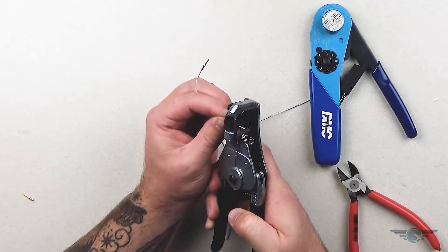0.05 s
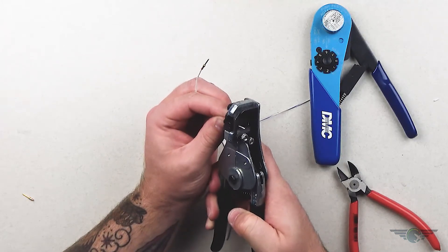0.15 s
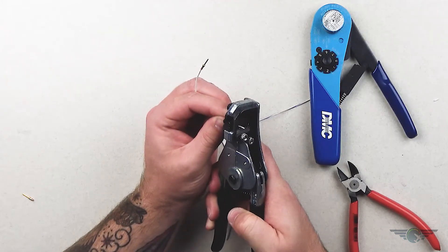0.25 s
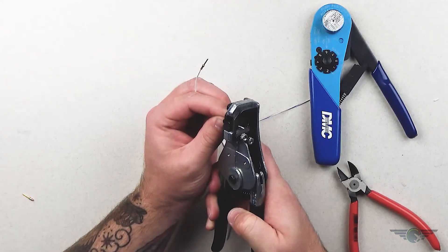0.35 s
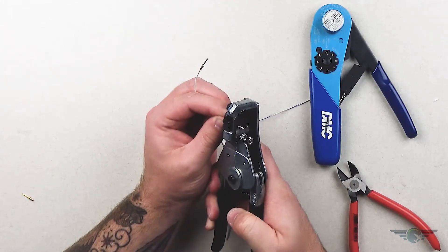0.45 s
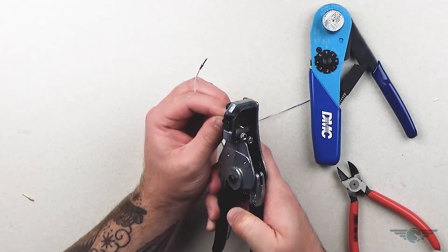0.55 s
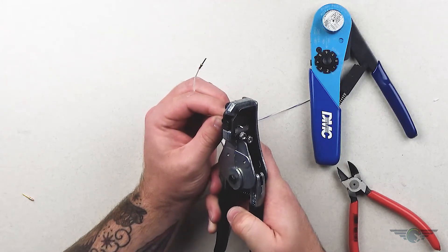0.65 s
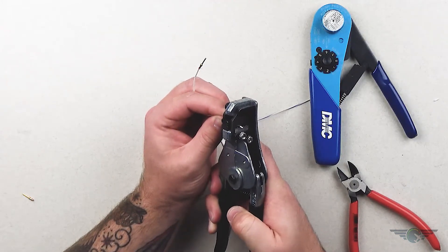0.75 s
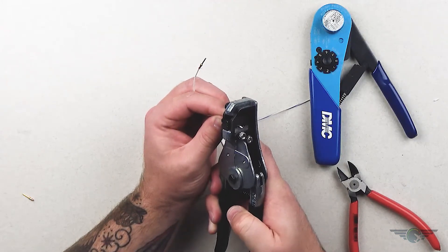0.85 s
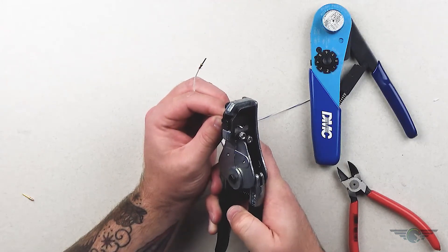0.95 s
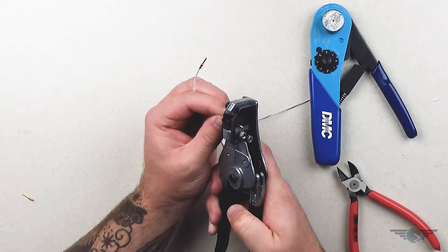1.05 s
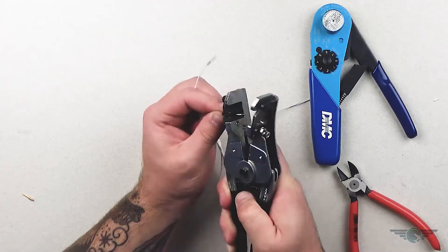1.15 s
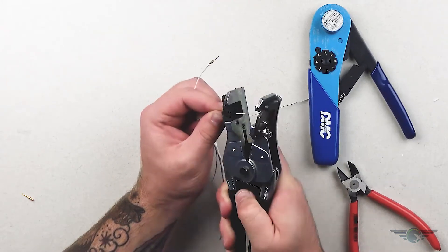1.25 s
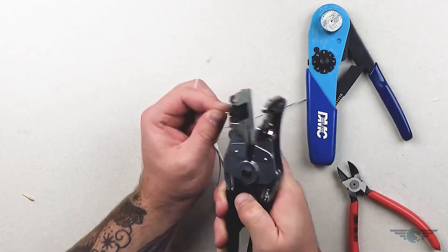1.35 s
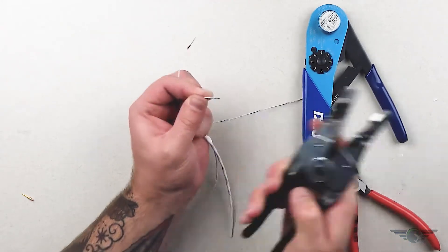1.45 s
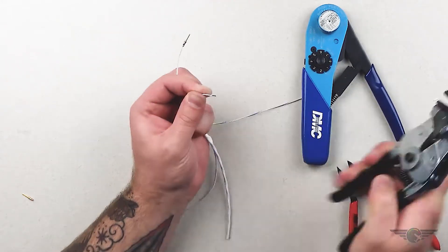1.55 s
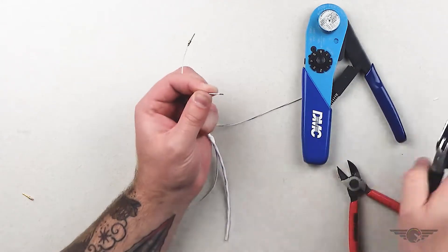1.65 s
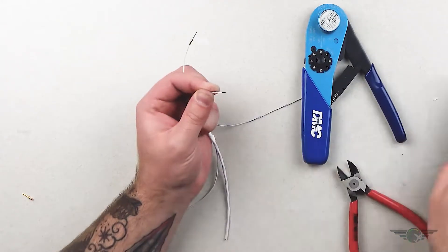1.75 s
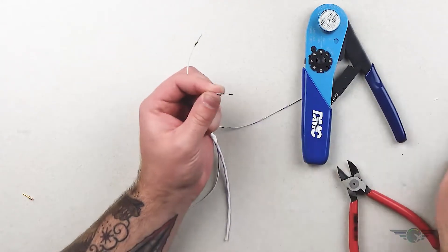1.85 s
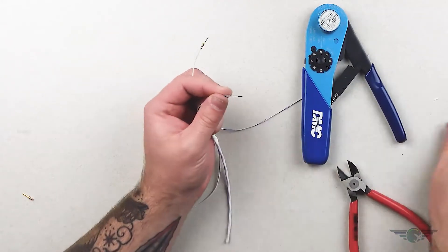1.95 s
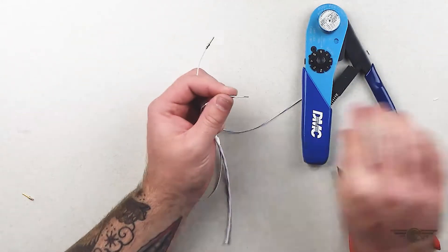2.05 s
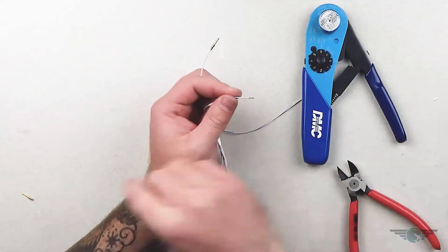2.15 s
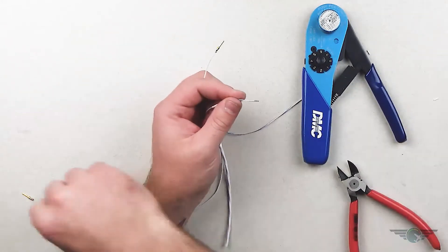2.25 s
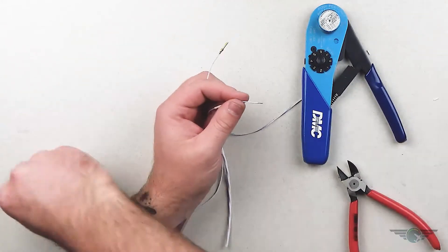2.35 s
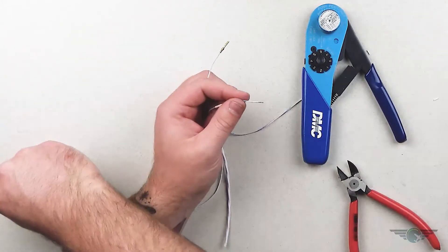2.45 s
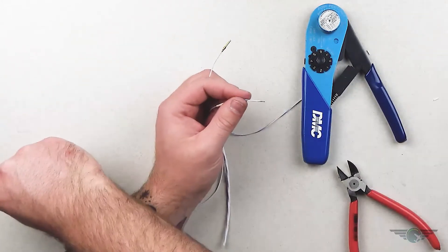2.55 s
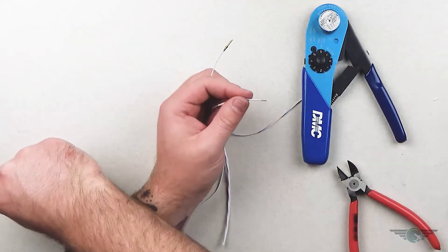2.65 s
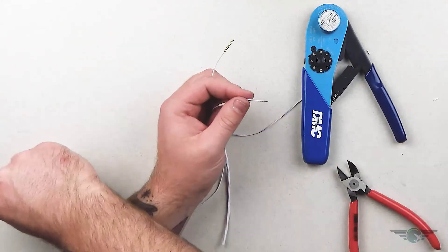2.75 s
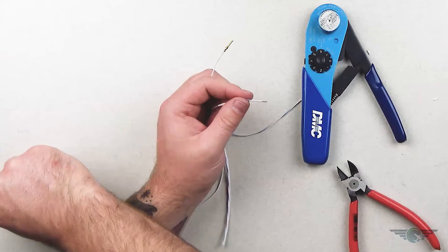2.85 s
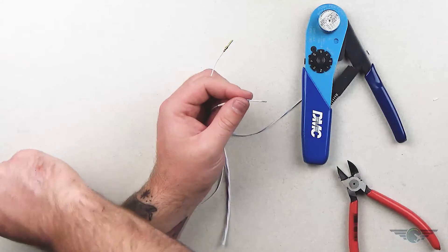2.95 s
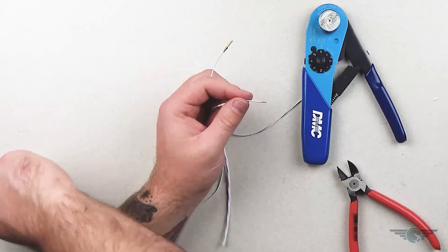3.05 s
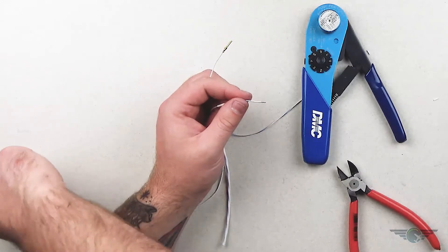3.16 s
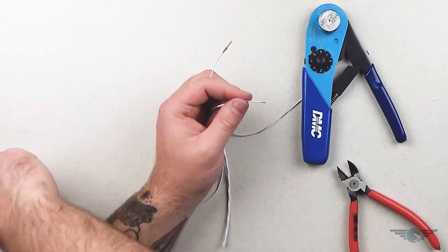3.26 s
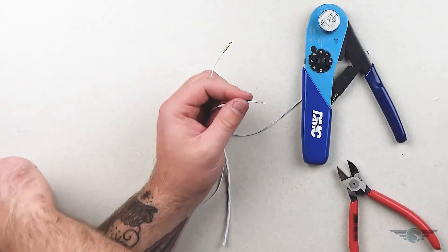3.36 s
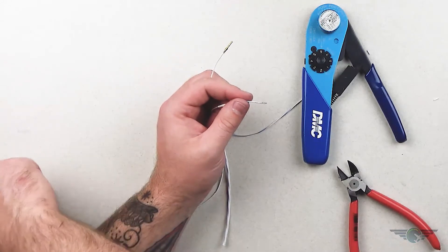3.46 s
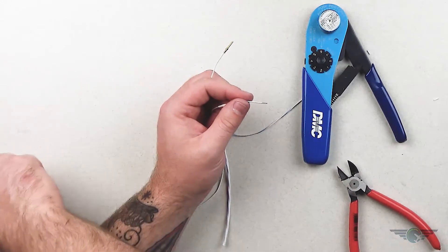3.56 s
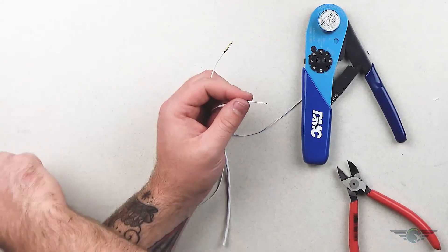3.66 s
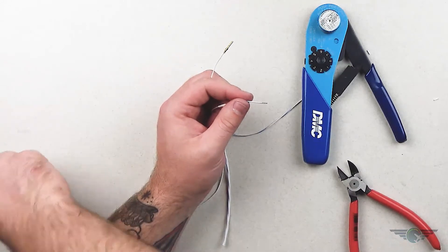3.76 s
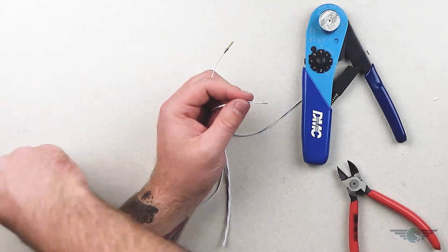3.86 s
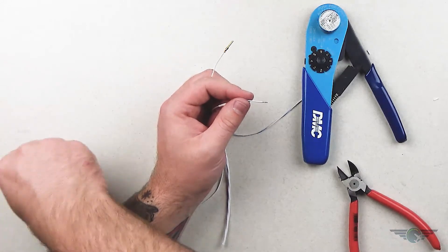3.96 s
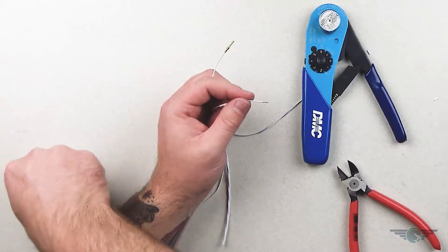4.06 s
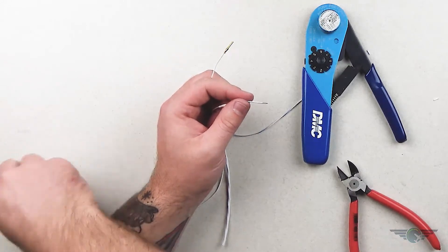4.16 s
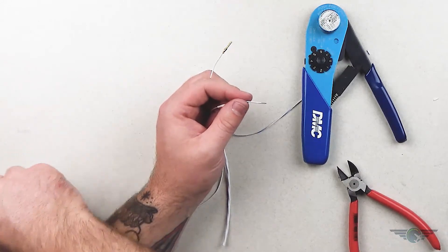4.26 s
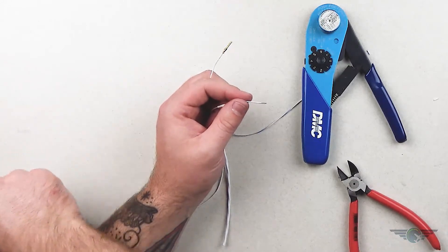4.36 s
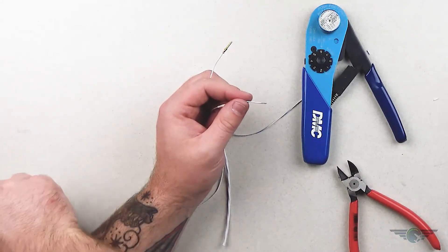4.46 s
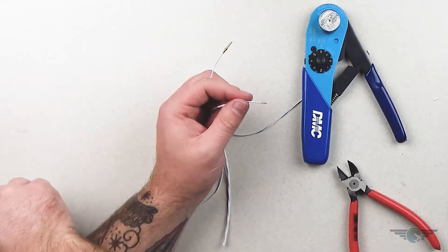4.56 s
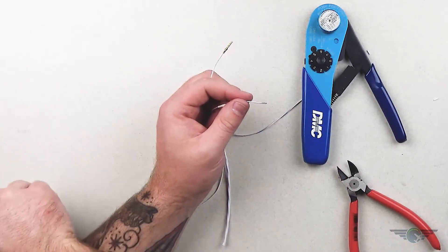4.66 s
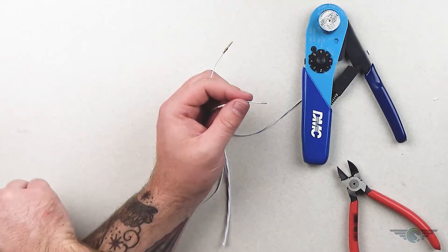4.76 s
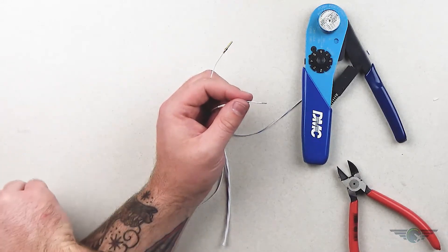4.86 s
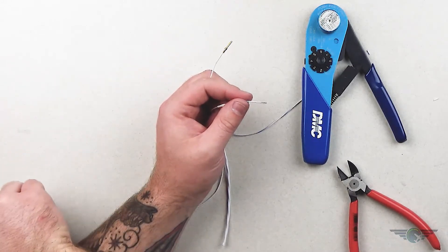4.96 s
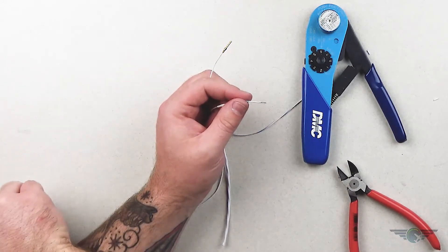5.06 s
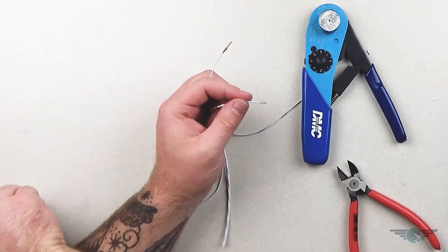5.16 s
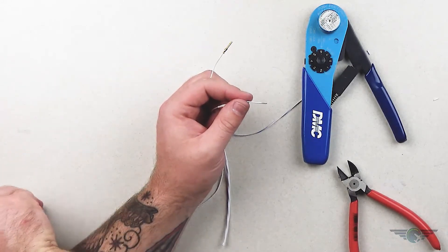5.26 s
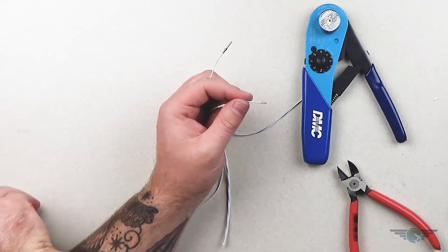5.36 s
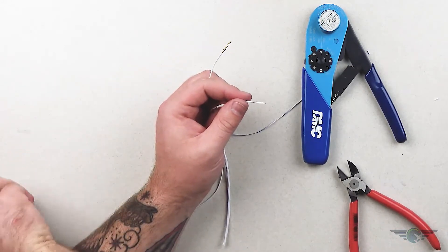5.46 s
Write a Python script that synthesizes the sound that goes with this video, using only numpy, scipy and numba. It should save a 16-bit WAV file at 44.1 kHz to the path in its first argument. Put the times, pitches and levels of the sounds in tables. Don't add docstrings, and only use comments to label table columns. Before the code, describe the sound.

Close microphone at a workbench in a small room. A deep electrical hum and soft fan noise run throughout. After a second of near quiet, a sprung wire stripper ticks and cracks, scrapes wire, snaps shut loudly, then lands on the bench with a heavy knock and quick bounces. Afterwards only hum, with faint finger rustles and tiny ticks.

```python
import sys
import numpy as np
from scipy import signal
from scipy.fft import rfft, irfft
from scipy.io import wavfile
from scipy.ndimage import uniform_filter1d, minimum_filter1d
from numba import njit

SR = 44100
rng = np.random.default_rng(int(sys.argv[2]) if len(sys.argv) > 2 else 0)


def transcribe(signal):
    frames = np.atleast_2d(signal).T
    limited = np.clip(frames, -1, 1)
    pcm = np.round(limited * 32767).astype(np.int16)
    wavfile.write(sys.argv[1], SR, pcm)


def volts_from_decibels(level):
    exponent = np.asarray(level, float) / 20
    return 10 ** exponent


N = 243431
T = np.arange(N) / SR


def level(x, db):
    return x * volts_from_decibels(db) / np.sqrt(np.mean(x ** 2))


def curve(rows):
    s, value = np.transpose(rows)
    return np.interp(T, s, value)


def band(x, lo_hz, hi_hz, order=2):
    edges_hz = [lo_hz, min(hi_hz, 0.45 * SR)]
    return signal.sosfilt(signal.butter(order, edges_hz, "band", fs=SR, output="sos"), x)


def coloured(points):
    hz, db = np.transpose(points)
    f = np.arange(N // 2 + 1) * SR / N
    shape = volts_from_decibels(np.interp(np.log(f + 1), np.log(hz), db))
    return irfft(rfft(rng.standard_normal(N)) * shape, N)


def fade(t, t60):
    return np.exp(-np.log(1000) * t / max(t60, 0.002))


def rise(size, seconds):
    return np.minimum(T[:size] / seconds, 1)


def stroke(s, length, attack, release):
    swell = (T - s) / attack
    let_go = 1 + (s + length - T) / release
    return np.clip(np.minimum(swell, let_go), 0, 1) ** 2


def rings(modes, size, scatter_db=0.0):
    t, out = T[:size], np.zeros(size)
    for hz, db, t60 in modes:
        uneven, detune = rng.standard_normal(2)
        tone = np.sin(2 * np.pi * hz * (1 + 0.003 * detune) * t)
        out += volts_from_decibels(db + scatter_db * uneven) * tone * fade(t, t60)
    return out


def tail(bands, size):
    out = np.zeros(size)
    for hz, db, t60 in bands:
        noise = band(rng.standard_normal(size), hz / 1.286, hz * 1.167)
        out += level(noise, db) * fade(T[:size], t60)
    return out


def add(out, s, sound):
    i = int(s * SR)
    out[i:i + len(sound)] += sound[:len(out) - i]


def crack(t60):
    return rng.standard_normal(4096) * fade(T[:4096], t60) * rise(4096, 0.00041) / 2


def push(t60):
    return np.sqrt(max(t60, 0.002) * SR / 55) * (np.arange(4096) == 0)


# time_s, gain_db
GAIN = [(0, -1.5), (1.2, 1.5), (2.2, -0.5), (3.5, 0.5), (4.5, 2), (5.52, 4)]


def rider_db():
    return curve(GAIN)


# multiple of shaft rate, level_db
MOTOR = [(2, -45), (5, -58.5), (8, -74.5), (9, -61.5), (10, -59.5)]
# pitch_hz, width_hz, level_db
DUCT = [(31.2, 1.4, -45), (42.2, 4.8, -56), (74.5, 2.5, -49), (122.2, 1.4, -47.5), (139.4, 5, -55.5),
        (161.8, 1.4, -56.5)]
# pitch_hz, density_db (per Hz)
AIR = [(15, -22), (35, 1), (140, -1), (250, -7), (1000, -25), (2000, -35.5), (5000, -44.5), (15000, -51.5)]


def fan():
    motor_hz = 56.65
    out = level(coloured(AIR), -42.5)
    for k, db in MOTOR:
        out += np.sqrt(2) * volts_from_decibels(db) * np.cos(2 * np.pi * (k * motor_hz * T + rng.random()))
    for hz, width, db in DUCT:
        noise = rng.standard_normal(N)
        out += level(band(noise, hz - width / 2, hz + width / 2, order=1), db)
    return out


# time_s, level_db
HUM = [(0.0, -32.5), (0.33, -27.5), (0.61, -27), (0.92, -29.5), (1.17, -24.5), (1.33, -26.5), (1.52, -30),
       (1.8, -27), (2.33, -31), (2.75, -27.5), (2.97, -30), (3.33, -26.5), (3.72, -28), (4.2, -25.5),
       (4.55, -27.5), (4.83, -23.5), (5.19, -26.5), (5.45, -23)]
# multiple of mains, level_db
RECTIFIER = [(2, -51), (3, -42), (4, -71.5), (5, -52.5), (7, -57), (8, -70), (9, -59), (11, -64),
             (13, -68.5), (15, -72), (19, -78), (21, -73)]
# pitch_hz, density_db (per Hz)
BUZZ = [(300, -27), (600, 6.5), (1200, -6), (2200, -6.5), (3400, -8), (5000, -18.5), (8000, -30.5),
        (14000, -25)]


def mains():
    mains_hz, start, pulse_lead, pulse_lag = 59.983, -0.64, 0.255, 2.25
    turn = 2 * np.pi * mains_hz * T
    hum = volts_from_decibels(curve(HUM) - rider_db()) * np.cos(turn + start)
    pulses = sum(volts_from_decibels(db) * np.cos(k * (turn + pulse_lead) - pulse_lag) for k, db in RECTIFIER)
    crests = np.exp(2.0 * (np.cos(2 * turn - 0.3) - 1))
    return np.sqrt(2) * (hum + pulses) + level(crests * coloured(BUZZ), -61.5)


# pitch_hz, level_db, t60_s
ROOM_TAIL = [(503, -1.5, 0.51), (980, -12, .5), (1980, -6, 0.41), (3385, -4, 0.42), (6000, -5, 0.36),
             (9500, -10, 0.36), (13500, -6.5, 0.25)]


def room_echo(sent):
    room = np.concatenate([np.zeros(200), volts_from_decibels(-51.5) * tail(ROOM_TAIL, size=30000)])
    near_walls = band(rng.standard_normal(6000), 1500, 16000, order=1) * fade(T[:6000], 0.09)
    room[:6000] += volts_from_decibels(-46) * near_walls
    return signal.fftconvolve(sent, room)[:N]


# start_s, length_s, level_db (2-6 kHz), treble_db
RUBS = [(1.128, 0.044, -57, -16), (1.151, 0.034, -46, -16), (1.383, 0.032, -48.5, -13),
        (1.43, 0.032, -54, -16), (1.496, .03, -48, -6), (1.537, 0.051, -46, -13), (1.613, 0.05, -51.5, 0.5),
        (3.812, 0.053, -55.5, -6), (3.876, 0.086, -59.5, -4.5), (3.959, 0.071, -58.5, -3),
        (4.049, 0.066, -61.5, -1.5)]


def rubs():
    grains = rng.standard_normal(N) * volts_from_decibels(2.0 * rng.exponential(size=N))
    held = np.repeat(rng.standard_normal(N // 300 + 1), 300)[:N]
    flicker = volts_from_decibels(1.8 * uniform_filter1d(held, size=150))
    body = level(band(grains, 2000, 6000) + 1.484 * band(grains, 3400, 3600, order=1), 0)
    other = grains[::-1]
    edge = level(band(other, 5500, 14000, order=1) + 2.0 * band(other, 7600, 8400, order=1), 0)
    out = np.zeros(N)
    for s, length, db, treble_db in RUBS:
        out += stroke(s, length, attack=0.016, release=0.032) * volts_from_decibels(db) * (body + volts_from_decibels(treble_db) * edge)
    return flicker * out


# start_s, peak_db (before the limiter), treble_db, contact_t60_s
DROP = [
    (1.8948, 5, -6.5, 0.04),
    (1.9691, 3.5, -22, 0.025),
    (1.985, -2.5, -40, 0.029),
    (2.003, -13, -30, 0.0071),
    (2.03, -18.5, -30, 0.0067),
]
# pitch_hz, level_db, t60_s
BENCH_TAIL = [(195.6, -5.5, 0.41), (366.3, -8, 0.82), (545, -2.5, 0.52), (816, 3, 0.37), (1300, 4.5, 0.55),
              (2190, -11, 0.42), (3300, -9, 0.53), (5484, -19, 0.19)]
# pitch_hz, level_db, t60_s
BENCH_MODES = [(406, 0, 0.12), (527, -25, .25), (864, -0.5, 0.42), (900, -8, 0.25), (1081, -14.5, 0.19),
               (1238, 2.5, .29), (1399, 12, 0.07), (1366, -7.5, 0.78), (1556, -29, 0.53)]
# pitch_hz, level_db, t60_s
STEEL_MODES = [(1394, -3, .6), (2541, -16, 3.0), (2988, -4, .3), (3596, -7, 1.3), (3741, -15, 1.4),
               (4064, -3, .7), (4527, -8, .75), (4705, -16, .6), (4780, -17, .6), (5216, -15, .7)]


def drop():
    blows, out = np.zeros(N), np.zeros((2, N))
    for s, db, treble_db, t60 in DROP:
        burst = volts_from_decibels(db) * np.array([crack(t60), push(t60)])
        dull = 2.1 * band(burst, 450, 4000)
        bright = -volts_from_decibels(treble_db) * band(burst, 4000, 16000)
        knock = 4.49 * band(burst[0], 1150, 1600, order=1) + 4.45 * band(burst[0], 503, 1050, order=1)
        add(blows, s, burst[1])
        add(out[0], s, dull[0] + bright[0] + knock)
        add(out[1], s, dull[1] + 0.19 * bright[1])

    knocks = (rng.random(N) < 2500 / SR) * rng.standard_normal(N)
    chatter = knocks * volts_from_decibels(-16.5) * stroke(1.898, 0.13, attack=0.0042, release=0.061)
    energy = np.abs(signal.fftconvolve(chatter ** 2, fade(T[:4096], 0.012))[:N])
    contacts = np.sqrt(energy) * rng.standard_normal(N)
    jingle = 0.24 + stroke(DROP[1][0], 0.048, attack=0.003, release=0.04)
    out += volts_from_decibels(-31.5) * band(contacts, 2500, 17000, order=1) * jingle * [[1], [1.5]]

    board = volts_from_decibels(-47.5) * tail(BENCH_TAIL, size=30000) + volts_from_decibels(-45) * rings(BENCH_MODES, size=30000)
    spreading = board * rise(30000, 0.003)
    out[0] += signal.fftconvolve(blows, spreading)[:N]
    local = board * fade(T[:30000], 0.09)
    out[0] += volts_from_decibels(20) * signal.fftconvolve(chatter, local)[:N]
    add(out[0], DROP[2][0], volts_from_decibels(-38.5) * rings(STEEL_MODES, size=80000) * rise(80000, 0.1) ** 0.5)
    return out


# (share below 2.7 kHz, bluntness)
TICKS = [(1.1245, -37.5, 5070, -18.5), (1.1504, -30.5, 8440, -30), (1.159, -33, 3314, -8),
         (1.181, -35, 7500, 2), (1.21, -3, 6000, -30), (1.2837, -42, 12500, -20.5),
         (1.288, -33.5, 7740, -15.5), (1.3455, -36.5, 3470, -20), (1.3464, -40.5, 5170, -19.5),
         (1.3843, -12, 9300, -23.5), (1.403, -38, 11050, -23.5), (1.4354, -25.5, 3300, -18.5),
         (1.464, -47, 8000, -25.5), (1.5508, -28, 5930, -15.5), (1.5648, -27.5, 6540, -18),
         (1.5745, -21, 5490, -15), (1.6061, -17, 9400, -9), (1.6095, -14, 3150, -12.5),
         (1.6333, -37.5, 9200, -25), (1.6456, -29, 4850, -22)]
# start_s, peak_db, ring_hz, low_db
PARTS = [(0.0663, -54, 4800, -10), (0.1024, -42, 3600, -23), (0.1051, -34, 5000, -28),
         (2.833, -47.5, 9500, -25.5), (3.8172, -57, 6500, -31.5), (3.8345, -52, 9500, -10),
         (3.8867, -59, 8000, -24.5), (3.9154, -62, 13000, -26), (3.9357, -61, 13500, -25),
         (4.592, -66, 12000, -29), (5.4062, -40, 3280, -10), (5.4167, -41, 3880, -5),
         (5.4124, -32, 9000, -5)]
# start_s, peak_db, ring_hz, low_db
SNAP = [
    (1.6725, -12.5, 10800, -16.5),
    (1.6739, -9, 8480, -13),
    (1.678, -5.5, 12200, -18.5),
    (1.6838, 18, 10130, -27),
]
# start_s, level_db, pitch_hz, t60_s
PINGS = [(.104, -40, 5150, .05), (.104, -47, 6620, .07), (.104, -47, 9400, .07), (.104, -44, 15700, .06),
         (1.15, -33, 28, .6), (1.4635, -32, 990, .03), (1.609, -27, 3200, .03), (1.615, -40, 5150, .12),
         (1.945, -22, 380, .5), (2.009, -32, 6750, .05), (5.414, -45, 9250, .07)]
# pitch_hz, level_db, t60_s
JAW_MODES = [(3330, 4, .05), (5370, -3, .04), (5505, 1.5, .04), (6620, 3.5, 0.055), (9180, -2, .04),
             (12300, -5, .03), (15610, -13, 0.041)]
CRACK_T60_S = {"jaw": 0.021, "part": 0.021, "snap": 0.019}
EDGE_DB = {"jaw": -9.5, "part": 2.5, "snap": -8.5}
EDGE_TOP_HZ = {"jaw": 16000, "part": 14000, "snap": 16000}
JAW_RING_DB = {"jaw": -28, "part": -60, "snap": -33}


def stripper():
    ring_db = {"jaw": 20, "part": 23.5, "snap": 20}
    out = np.zeros((2, N))
    for kind, rows in (("jaw", TICKS), ("part", PARTS), ("snap", SNAP)):
        t60 = CRACK_T60_S[kind]
        for s, db, hz, low_db in rows:
            burst = np.array([crack(t60), push(t60)])
            high_db = EDGE_DB[kind] + 3.5 * np.log2(hz / 6000) + 0.1951 * (min(db, -5) + 28.5)
            sound = 0.96 * band(burst, 2800, 7500)
            sound -= 2.1 * volts_from_decibels(high_db) * band(burst, 7500, EDGE_TOP_HZ[kind])
            sound -= 3.5 * volts_from_decibels(low_db) * band(burst, 520, 2700)
            part_db = ring_db[kind] - 0.21 * (db + 30)
            part = volts_from_decibels(part_db) * band(burst[0], hz * 0.97, hz * 1.03, order=1) / 2
            jaws = rings(JAW_MODES, size=6000, scatter_db=4.5)
            add(out[0], s, volts_from_decibels(db) * (sound[0] + part))
            add(out[0], s, volts_from_decibels(db + JAW_RING_DB[kind]) * jaws)
            add(out[1], s, volts_from_decibels(db) * sound[1])
    for s, db, hz, t60 in PINGS:
        add(out[0], s, rings([(hz, db, t60)], size=12000) * rise(12000, 0.00089))
    return out


def scene():
    background = volts_from_decibels(rider_db()) * (mains() + fan())
    near, sent = stripper() + rubs() + drop()
    return (near + room_echo(sent) + background)[None]


@njit
def duck(need_db, attack, step_db):
    out, g = np.empty(len(need_db)), 0.0
    for i in range(len(need_db)):
        if need_db[i] < g:
            g = g + attack * (need_db[i] - g)
        else:
            g = min(need_db[i], g + step_db)
        out[i] = g
    return out


def roll_off(x):
    return signal.sosfilt(signal.butter(12, 16940, fs=SR, output="sos"), x)


def record(dry):
    dry = signal.sosfilt(signal.cheby1(10, 0.5, 15800, fs=SR, output="sos"), dry)
    threshold_db, attack_s, release_db_per_s, ceiling = -11.0, 0.0016, 500.0, 0.48
    need_db = np.minimum(threshold_db - 20 * np.log10(np.abs(dry[0]) + 1e-9), 0)
    held_db = minimum_filter1d(need_db, size=61)
    gain_db = duck(held_db, 1 / (attack_s * SR), release_db_per_s / SR)
    clipped = ceiling * np.tanh(dry * volts_from_decibels(gain_db) / ceiling)
    finished = signal.sosfiltfilt(signal.butter(12, 16900, fs=SR, output="sos"), clipped)
    return roll_off(finished)


dry = scene()
out = record(dry)
transcribe(out)
```